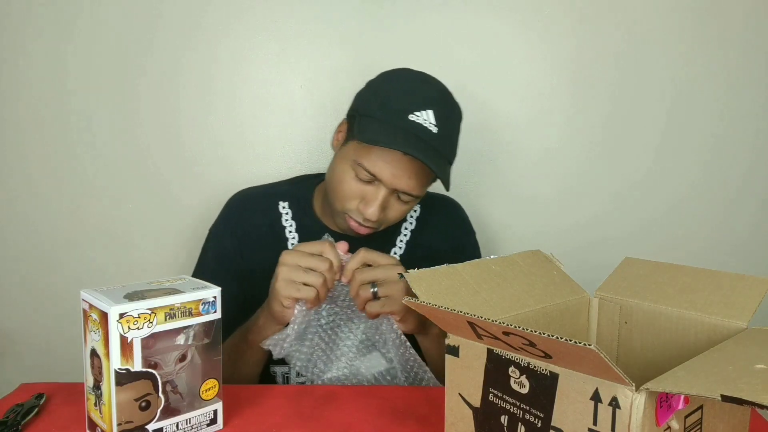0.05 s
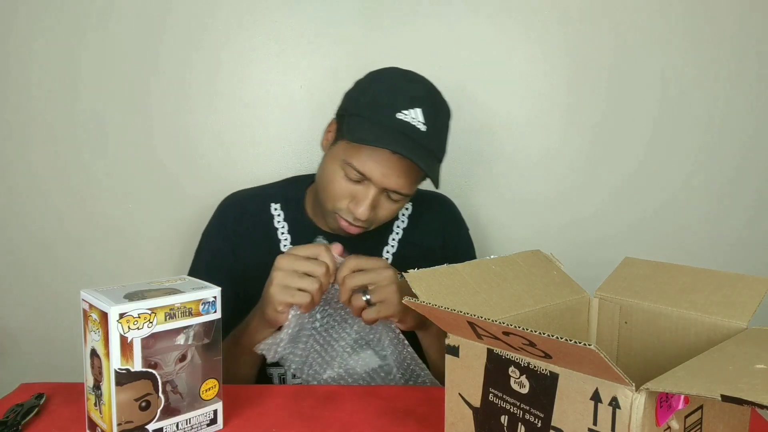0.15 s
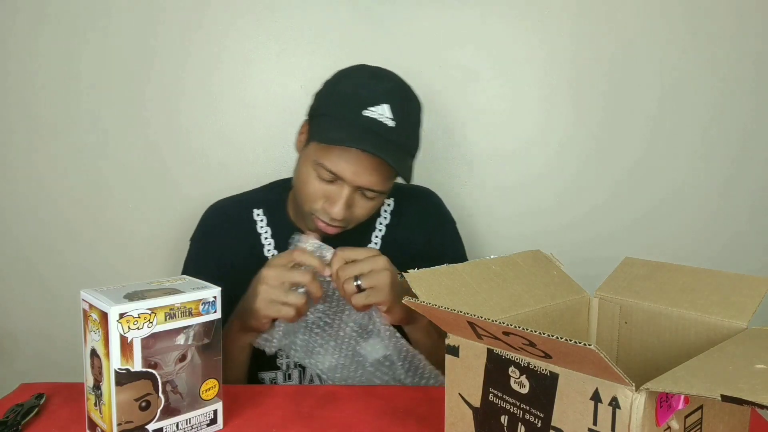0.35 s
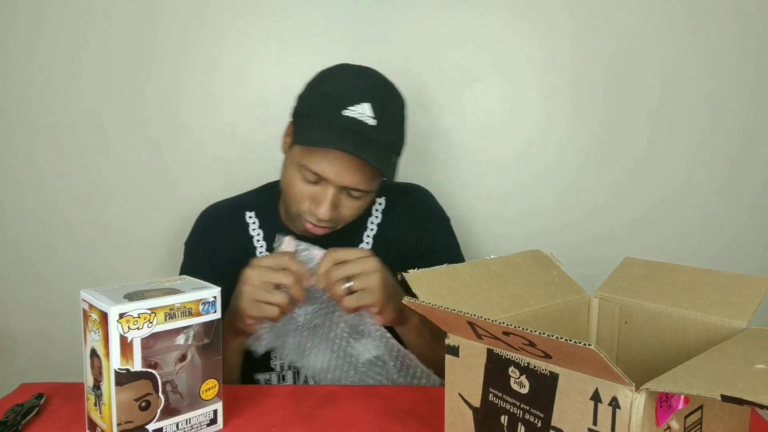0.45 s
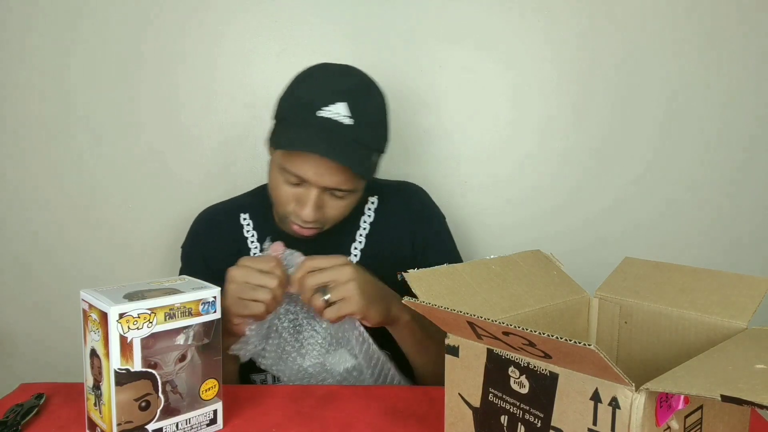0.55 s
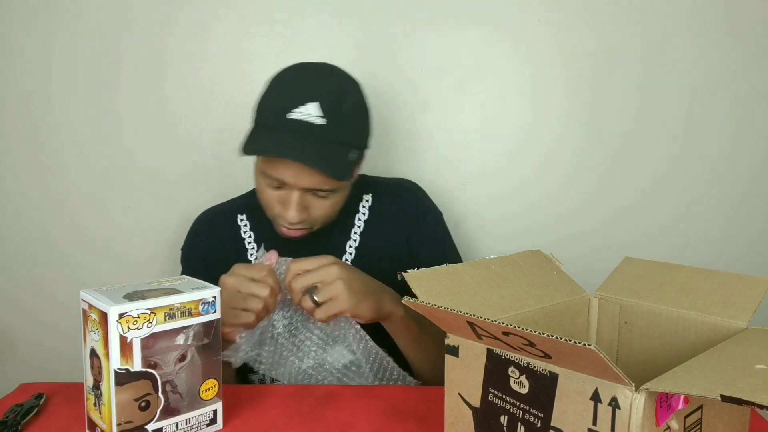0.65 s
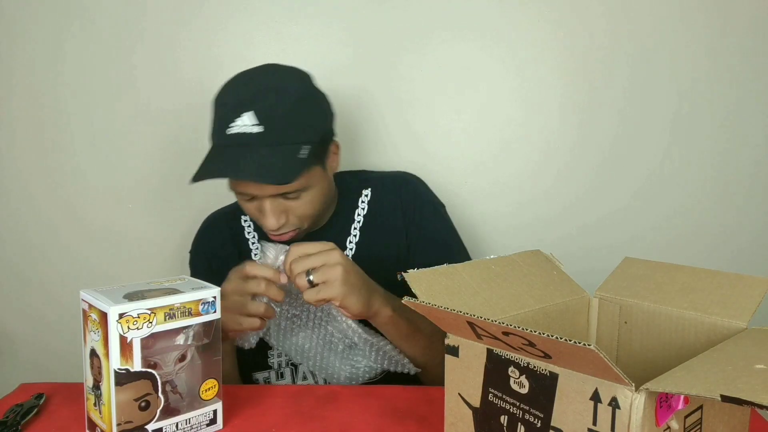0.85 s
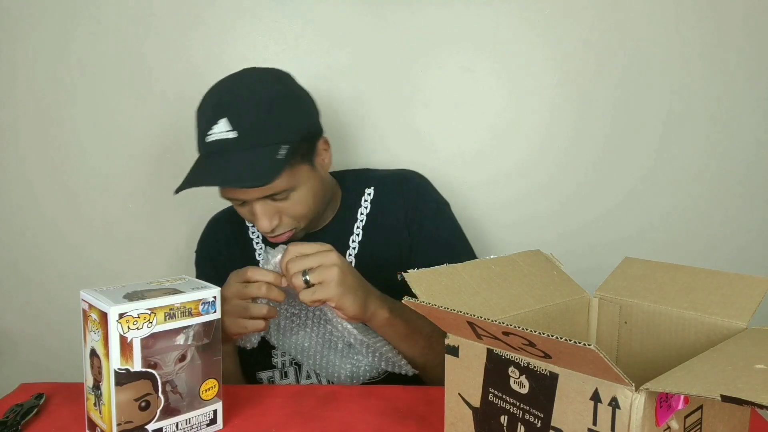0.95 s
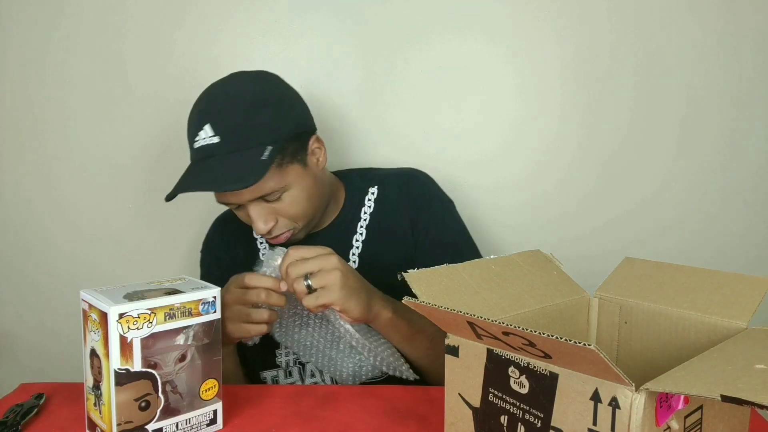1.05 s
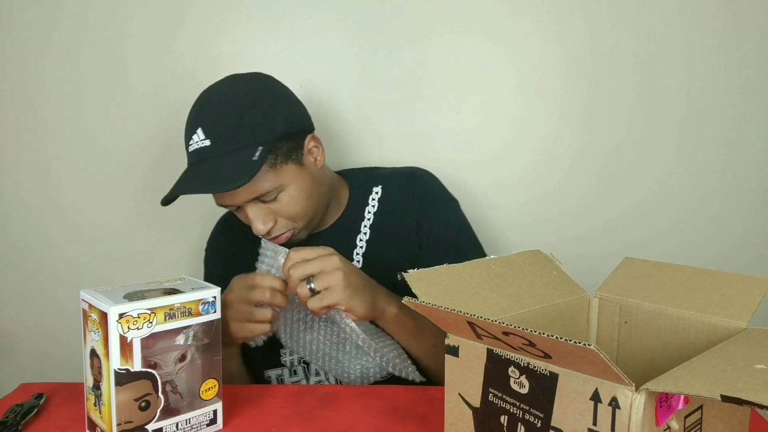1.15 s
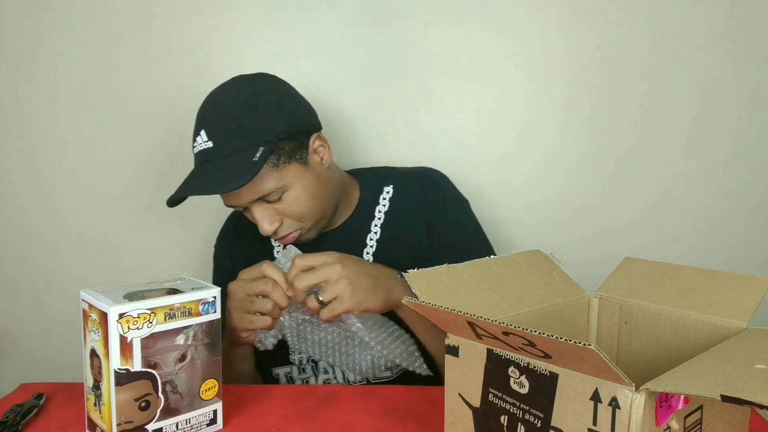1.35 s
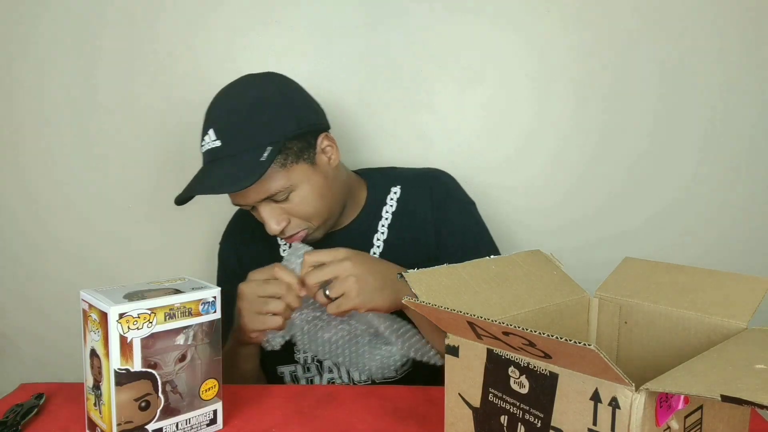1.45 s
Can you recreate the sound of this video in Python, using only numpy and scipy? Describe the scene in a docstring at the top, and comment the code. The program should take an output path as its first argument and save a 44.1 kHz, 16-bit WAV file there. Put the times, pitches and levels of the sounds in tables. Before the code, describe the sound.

Bubble wrap pops sharply close to the microphone, first at about 0.2 seconds, then in quick pairs near 0.4 and 0.6 seconds, some with a soft low puff of air. The plastic crinkles lightly under the fingers until another sharp pop at 1.2 seconds and a faint one at 1.4. Each pop fades quickly in the small, quiet room.

```python
"""A small, quiet room, with fingers squeezing a sheet of bubble wrap close to the microphone.
Each cell bursts with a crack of film and a short ring: the cell's resonances, plus a high ring near
8.3 kHz, probably the microphone's. Some pops blow a puff of air at the mic; between them the sheet
crinkles. Table, body and wall answer with a few reflections, then a short tail dies away into
faint rumble and hiss."""
import sys
import numpy as np
from scipy import signal
from scipy.fft import rfft, irfft
from scipy.io import wavfile

SR = 44100
rng = np.random.default_rng(int(sys.argv[2]) if len(sys.argv) > 2 else 0)


def dump_mix(stems):
    """Bounce the given channels to the path in sys.argv[1] as a 16-bit WAV at rate SR."""
    frames = np.atleast_2d(stems).T  # one column per channel
    limited = np.clip(frames, -1, 1)  # hard clip at full scale
    pcm = np.round(limited * 32767).astype(np.int16)
    wavfile.write(sys.argv[1], SR, pcm)


N = 66150
CRACK_RISE_S = 0.000376


def amp(db):
    """Decibels to gain."""
    return 10 ** (np.asarray(db) / 20)


def unit(x):
    """Scales to an energy of 1."""
    return x / np.sqrt(np.sum(x ** 2) + 1e-20)


def read(points, hz):
    """Reads a table on a log-frequency axis."""
    f, value = np.transpose(points)
    return np.interp(np.log(hz + 1), np.log(f + 1), value)


def level(points):
    """Gain over time from points in seconds and dB."""
    return amp(np.interp(np.arange(N) / SR, *np.transpose(points)))


def add(mix, start_s, sound):
    """Mixes a sound in at its start time."""
    part = mix[max(round(start_s * SR), 0):][:len(sound)]
    part += sound[:len(part)]


def bins(size=2048):
    """Frequencies of a spectrum in Hz."""
    return np.fft.rfftfreq(size, 1 / SR)


def colour(x, gains_db):
    """Minimum-phase filter with the given gain at each bin."""
    log_gain = np.log(amp(np.r_[gains_db, gains_db[-2:0:-1]]))
    response = np.exp(np.conj(signal.hilbert(log_gain)))
    return signal.fftconvolve(x, np.fft.ifft(response).real)[:len(x)]


def burst(rise_s, decay_s, size=1024):
    """A brief random burst with an even spectrum."""
    t = np.arange(size) / SR
    envelope = (1 - np.exp(-t / rise_s)) * np.exp(-t / decay_s)
    x = rng.standard_normal(size) * envelope
    for _ in range(4):  # flatten the spectrum, then make it brief again
        z = rfft(x)
        x = irfft(z / (abs(z) + 1e-12)) * np.sqrt(envelope)
    return unit(x)


def background():
    """The room's own faint rumble and hiss."""
    # Each row: frequency in Hz, relative noise density in dB.
    spectrum = [(20, -30), (45, -7), (75, -3.5), (130, -6.5), (220, -10), (500, -15), (1200, -22),
                (4000, -17.5), (9000, -43), (15000, -35)]
    # Each row: time in seconds, RMS level in dB.
    loudness = [(0, -56), (.3, -61.5), (.8, -55), (1.2, -53), (1.5, -49.5)]
    noise = irfft(rfft(rng.standard_normal(N)) * amp(read(spectrum, bins(N))), N)
    return unit(noise) * np.sqrt(N) * level(loudness)


def crinkle(creases_per_s=1500, spread_db=5.5, rub_db=-2):
    """Many tiny creases and some rubbing follow the hands; a few creases snap over louder."""
    # Each row: frequency in Hz, relative density of the crinkle in dB.
    spectrum = [(100, -32), (400, -10.5), (1000, -9.5), (2300, -6), (4000, -6), (6000, -4), (7400, -3),
                (8350, 3), (9300, -10), (11000, -20.5), (15500, -30)]
    # The hands working the sheet. Each row: time in seconds, relative level in dB.
    handling = [(0, -41), (.02, -41.5), (.09, -49.5), (.16, -45), (.2, -50.5), (.48, -45.5), (.53, -41.5),
                (.59, -50.5), (.72, -47), (.79, -39), (.87, -37), (.93, -54), (.98, -41.5), (1.015, -45.5),
                (1.06, -40), (1.17, -38), (1.25, -46), (1.35, -46.5), (1.42, -38), (1.47, -49.5),
                (1.5, -27)]
    # Each row: start of a snap in seconds, level in dB.
    snaps = [(0.1065, -18.5), (.1450, -21), (0.1616, -20.5), (.1660, -21), (.5145, -14.5), (.7752, -12.5),
             (.8462, -12), (0.8638, -26), (0.9776, -17), (1.0406, -18), (1.0584, -16), (1.0695, -15.5),
             (1.11, -32)]
    tone = read(spectrum, bins())
    sizes = amp(spread_db * np.minimum(rng.exponential(1, N), 3)) * rng.choice([-1, 1], N)
    creases = unit(sizes * (rng.random(N) < creases_per_s / SR))
    rubbing = amp(rub_db) * unit(rng.standard_normal(N))
    out = unit(colour(creases + rubbing, tone)) * np.sqrt(N / 2) * level(handling)
    for start, db in snaps:
        add(out, start, amp(db) * unit(colour(burst(CRACK_RISE_S, decay_s=0.00115), tone)))
    return out


def room(x, build_s=0.0035, size=14000):
    """A few slightly scattered reflections and a short diffuse tail come back to the mic."""
    # Each row: frequency in Hz, seconds to fall 60 dB.
    decay_times = [(200, 0.16), (700, 0.406), (1800, 0.3445), (4500, 0.3042), (8300, 0.3443), (13000, 0.29)]
    # Reflections off table, body and wall. Each row: delay in seconds, level in dB.
    echoes = [(.0014, -6.5), (.0078, -11.5), (0.0113, -8.5), (0.019, -16.5), (.0229, -27)]
    # Colour of reflections and tail. Each row: frequency in Hz, gain in dB.
    tone = [(150, 1.5), (500, 2), (900, -3), (1350, -0.5), (1800, 1.5), (2600, -3), (3400, -1), (4300, -1),
            (6000, -2.5), (8300, -2), (9200, -0.5), (13000, -6)]
    hz, t, noise = signal.stft(rng.standard_normal(size), SR, nperseg=256)
    fall = np.exp(-np.log(1000) * t / read(decay_times, hz)[:, None])
    tail = signal.istft(noise * fall, SR)[1][:size]
    response = unit(tail * (1 - np.exp(-np.arange(size) / SR / build_s)))
    for delay, db in echoes:
        add(response, delay, amp(db) * burst(rise_s=0.0002, decay_s=0.0004))
    return colour(signal.fftconvolve(x, response)[:N], read(tone, bins()))


def puffs(thump_hz=60.9, damping=0.45, leak_hz=40, rise_s=0.00035, size=6000):
    """Escaping air pushes the microphone, which swings back in a low thump."""
    # Each row: start in seconds, strength of the push in dB, decay in seconds.
    pushes = [(0.1933, -21.5, 0.00165), (.2142, -19, 0.0012), (0.3538, -19.5, .0065),
              (0.6057, -21.5, 0.00071)]
    out, t = np.zeros(N), np.arange(size) / SR
    s = 1j * bins(size) / thump_hz
    resonance = s ** 2 / (s ** 2 + damping * s + 1)
    leak = s / (s + leak_hz / thump_hz)
    for start, db, decay_s in pushes:
        push = -amp(db) * (1 - np.exp(-t / rise_s)) * np.exp(-t / decay_s)
        add(out, start, irfft(rfft(push) * resonance * leak))
    return out


def crack(db, decay_s, centre_hz, focus_db):
    """The film tears: a burst of a millisecond or so, strongest around its centre."""
    # Spectrum of tearing film. Each row: frequency in Hz, relative level in dB.
    film = [(100, -32), (350, -1), (600, -4), (900, -0.5), (2000, -1), (4000, -0.5), (6500, 0.5), (8500, 1),
            (10000, -11.5), (12000, -16.5), (15500, -20)]
    hz = bins()
    octaves = np.log2(np.maximum(hz, 200) / centre_hz)
    focus = np.maximum(-focus_db * octaves ** 2, -30)
    return amp(db) * unit(colour(burst(CRACK_RISE_S, decay_s), read(film, hz) + focus))


def ring(start_s, decay_s, rise_s=0.00029, low_cut_hz=418, size=1024):
    """A pop's short ring: the cell's resonances, plus a high ring near 8.3 kHz, probably the mic's."""
    # Each row: time of the pop in seconds, resonance in Hz, relative level in dB.
    resonances = [(.2144, 2015, -12), (.2144, 6300, -10), (.2144, 8560, 2), (.3533, 5130, -9),
                  (.3533, 6730, -10), (.3533, 7830, -3), (.3880, 1420, -15.5), (.3880, 2780, -14.5),
                  (.3880, 4540, -22), (.6053, 864, -20), (.6053, 1396, -14.5), (.6053, 2167, -14.5),
                  (.6053, 3710, -10), (.6053, 4430, -14.5), (.6053, 6020, -12.5), (.6053, 8660, -11),
                  (.6411, 1400, -17), (.6411, 1790, -12), (.6411, 3100, -11.5), (.6411, 8200, 2),
                  (1.1821, 910, -22), (1.1821, 1237, -11.5), (1.1821, 2000, -7.5), (1.1821, 3610, -16.5),
                  (1.1821, 4490, -11.5), (1.1821, 9100, -13), (1.4085, 523, -28.5), (1.4085, 1162, -27.5),
                  (1.4085, 2470, -22.5), (1.4085, 8100, -25.5)]
    t = np.arange(size) / SR
    envelope = 2 * (1 - np.exp(-t / rise_s)) * np.exp(-t / decay_s)
    modes = [(hz, db) for pop_s, hz, db in resonances if abs(pop_s - start_s) < .01]
    ringing = envelope * sum(amp(db) * np.sin(2 * np.pi * hz * t) for hz, db in modes)
    # A small cell radiates little bass.
    return signal.lfilter(*signal.butter(2, low_cut_hz, "high", fs=SR), ringing)


def pops(ring_send_db=-7.5):
    """Each cell bursts at another spot, so the room answers each one a little differently."""
    # Each row: start in seconds, crack level in dB, its decay in seconds, its centre in Hz,
    # fall an octave from the centre in dB, room level in dB, ring decay in seconds.
    events = [(.2144, 5.5, 0.00082, 5740, 1.33, 1.5, 0.00071), (0.3531, 4.5, .0007, 6600, 1.8, 2, 0.00068),
              (.3880, -0.5, 0.000974, 3730, 4, 4, 0.00066), (0.6055, 6.5, 0.0012, 6000, 1.75, 2.5, 0.001),
              (0.6412, 1, 0.0005, 4250, 1.35, -0.5, 0.00061),
              (1.1821, 3.5, 0.000758, 3470, 6, 2.5, 0.00064),
              (1.4084, -20, 0.00071, 1700, 1, -2.5, 0.00084)]
    out = np.zeros(N)
    for start, crack_db, crack_s, centre_hz, focus_db, room_db, ring_s in events:
        tear = crack(crack_db, crack_s, centre_hz, focus_db)
        ringing = ring(start, ring_s)
        add(out, start, tear + ringing)
        add(out, start, amp(room_db) * room(tear + amp(ring_send_db) * ringing))
    return out


def scene(sheet_room_db=-2.5):
    """Pops, puffs and crinkle close to one microphone, with the room behind them."""
    sheet = crinkle()
    return (pops() + puffs() + sheet + amp(sheet_room_db) * room(sheet) + background())[None]


def record(dry, knee=7, cutoff_hz=15600):
    """The loudest pops overload the input; a low-pass then takes off the highest treble."""
    clipped = dry / (1 + abs(dry) ** knee) ** (1 / knee)
    lowpass = signal.firwin(255, cutoff_hz, window=("kaiser", 8), fs=SR)
    return signal.oaconvolve(clipped, lowpass[None], "same")


dry = scene()
out = record(dry)
dump_mix(out)
```